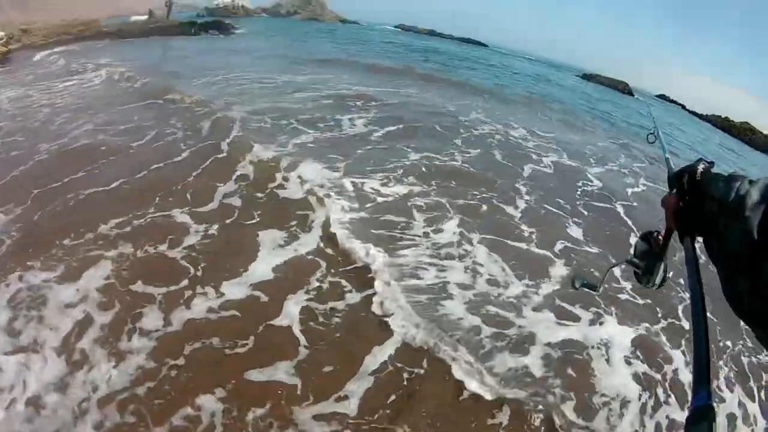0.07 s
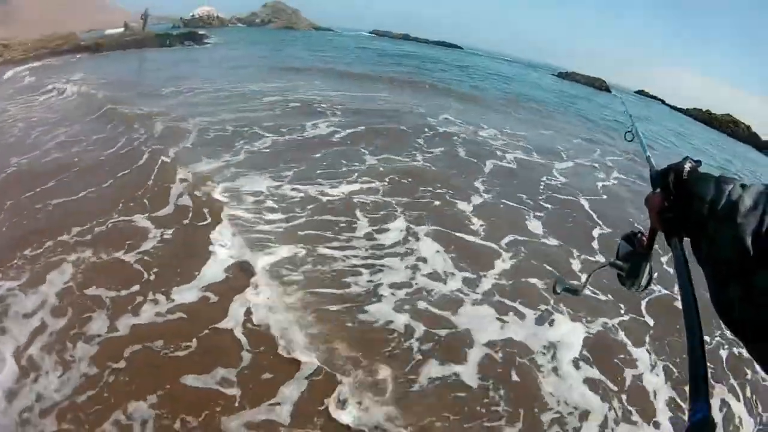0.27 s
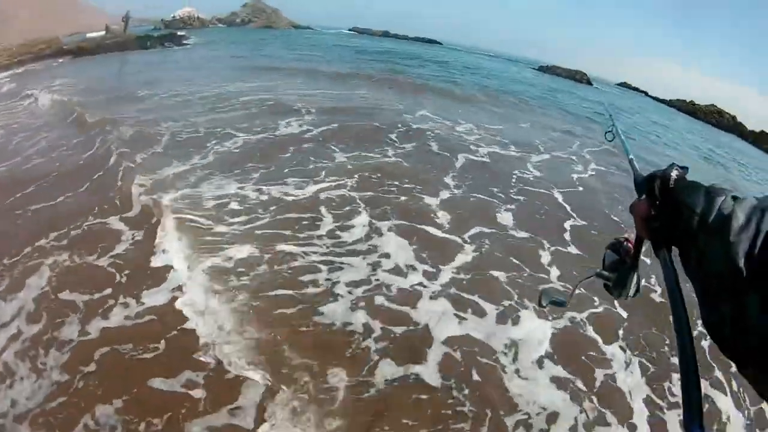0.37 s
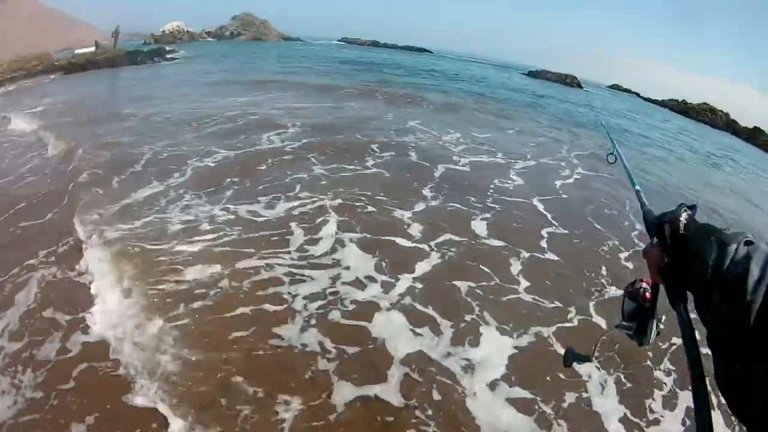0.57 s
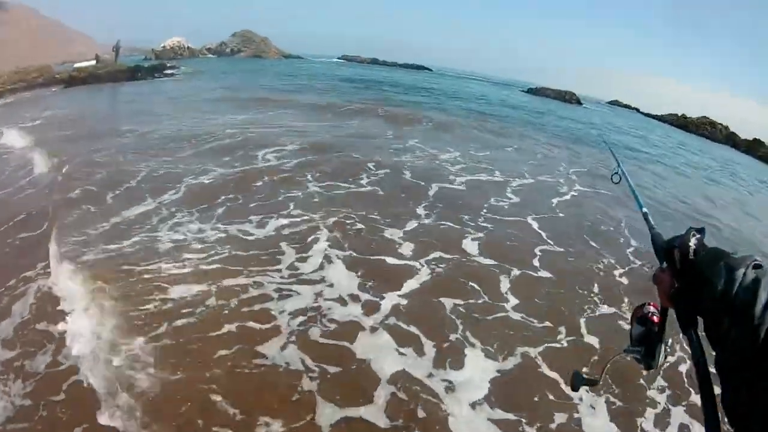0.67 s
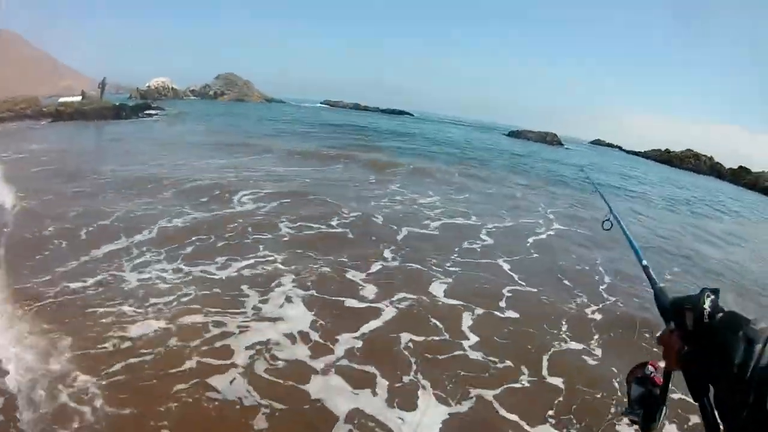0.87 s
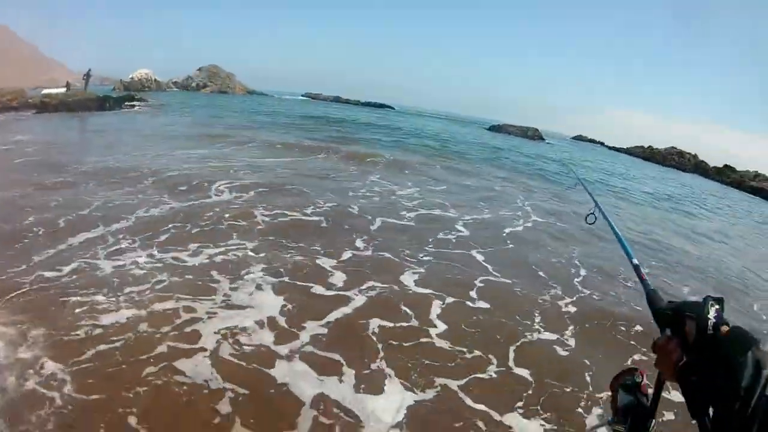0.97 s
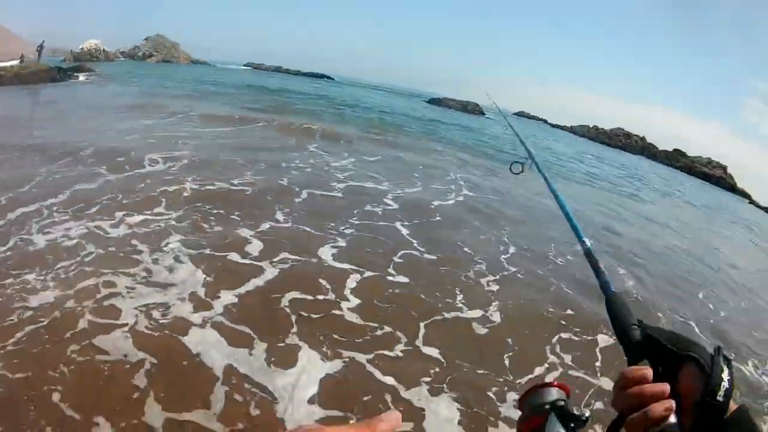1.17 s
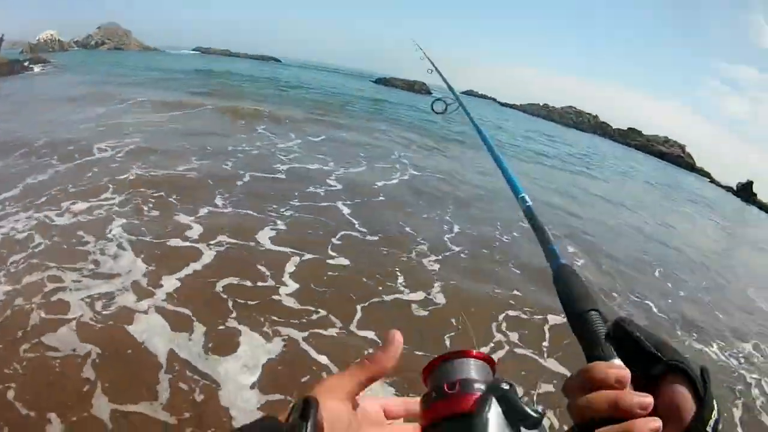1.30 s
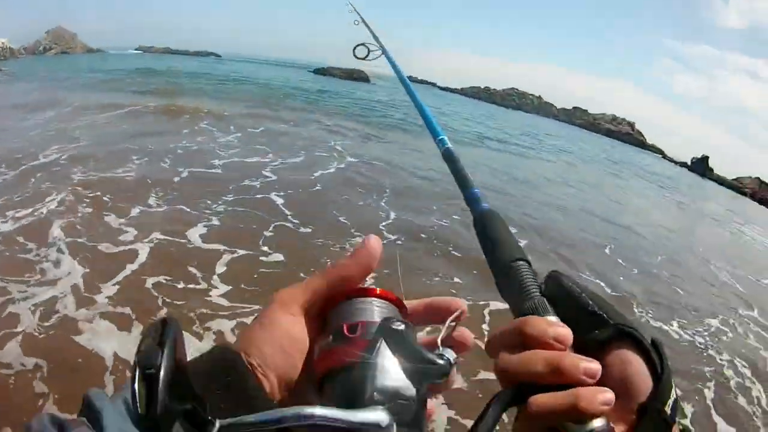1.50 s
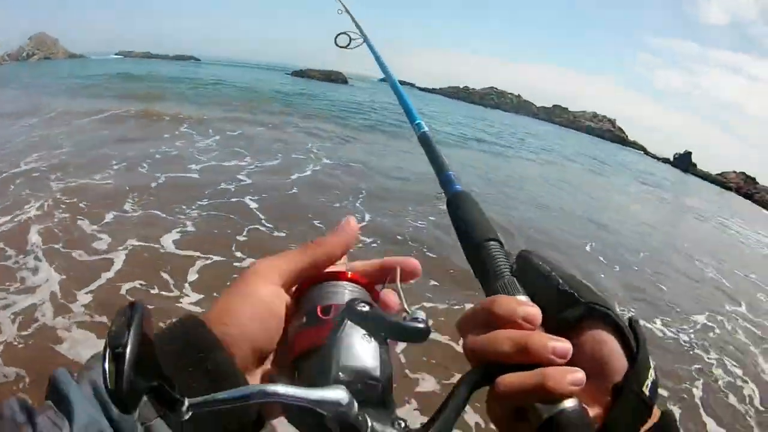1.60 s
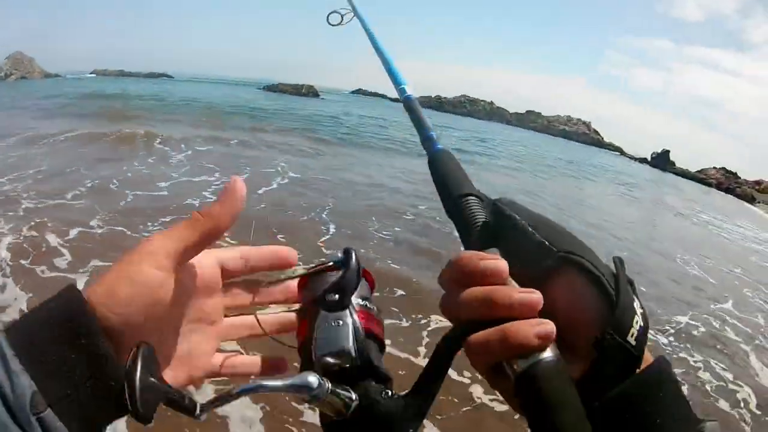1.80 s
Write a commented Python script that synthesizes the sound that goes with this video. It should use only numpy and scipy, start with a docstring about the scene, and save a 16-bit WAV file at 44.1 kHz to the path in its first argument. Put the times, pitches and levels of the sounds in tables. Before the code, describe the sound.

Shallow waves wash dully in the wind as fishing gear gives a single short knock.

```python
"""Angler on a windy shore

Shallow surf washes over rocks in steady wind, heard muffled through the waterproof case of a
body-worn camera. Both are shaped noise, and the air resonances of the case colour the surf.
The angler shifts the rod: one impact rings the gear, a sleeve brushes past, and handling adds
soft bumps, thin scratches and squeaks, a low stick-slip creak and faint ticks that ring the case."""
import sys
import numpy as np
from scipy import signal
from scipy.fft import rfft, irfft, next_fast_len
from scipy.io import wavfile
from scipy.ndimage import uniform_filter1d, map_coordinates

SR = 44100
rng = np.random.default_rng(int(sys.argv[2]) if len(sys.argv) > 2 else 0)


def transcribe(signal):
    """Save signal, clipped to [-1, 1], as a 16-bit WAV file at the path in sys.argv[1]."""
    frames = np.atleast_2d(signal).T
    limited = np.clip(frames, -1, 1)
    pcm = np.round(limited * 32767).astype(np.int16)
    wavfile.write(sys.argv[1], SR, pcm)


N = 81585
TIME_S = np.arange(N) / SR


def amp(db):
    """Decibels to amplitude ratio."""
    return 10 ** (np.asarray(db) / 20)

def unit_rms(x):
    """Normalisation to rms 1."""
    return x / np.sqrt(np.mean(x ** 2) + 1e-20)

def spectrum_db(points, hz):
    """Interpolation of a spectrum on a log frequency axis."""
    frequency_hz, gain_db = np.transpose(points)
    return np.interp(np.log(hz + 1), np.log(frequency_hz + 1), gain_db)

def contour_db(points):
    """Linear interpolation of a level over time."""
    return np.interp(TIME_S, *np.transpose(points))

def wobble(rate_hz):
    """Smooth random modulation: a spline through rate_hz knots a second."""
    return map_coordinates(rng.standard_normal(4096), [TIME_S * rate_hz], mode="wrap")

def filtered(x, response):
    """Linear filtering: the spectrum times a frequency response."""
    size = 2 * next_fast_len(N)
    return irfft(rfft(x, size) * response(np.fft.rfftfreq(size, 1 / SR)), size)[:N]

def minimum_phase(gain):
    """The causal response with this gain, by folding the cepstrum."""
    cepstrum = irfft(np.log(np.maximum(gain, 1e-6)))
    half = len(cepstrum) // 2
    cepstrum[1:half] *= 2
    cepstrum[half + 1:] = 0
    return np.exp(rfft(cepstrum))

def impulse(start_s):
    """A band-limited unit impulse."""
    offset = (TIME_S - start_s) * SR
    return np.sinc(offset) * (np.abs(offset) < 16)

def shaped_noise(shape_db, patchy_db):
    """Coloured noise of rms 1, its gain varying in random patches of time and frequency."""
    cells = signal.stft(rng.standard_normal(N), nperseg=512)[2]
    patches = uniform_filter1d(rng.standard_normal(cells.shape), size=4, axis=0)
    patches = uniform_filter1d(patches, size=8, axis=1)
    noise = signal.istft(cells * amp(patchy_db * unit_rms(patches)), nperseg=512)[1][:N]
    return unit_rms(filtered(noise, lambda hz: amp(shape_db(hz))))

def swell(start_s, length_s):
    """A half-sine envelope."""
    return np.sin(np.pi * np.clip((TIME_S - start_s) / length_s, 0, 1))

def phase(hz, jitter, rate_hz):
    """Phase as the integral of a frequency that wanders by the fraction jitter."""
    return 2 * np.pi * np.cumsum(hz * (1 + jitter * wobble(rate_hz))) / SR

def wavering_tones(rows, jitter, rate_hz):
    """Frequency-modulated sines, each under a half-sine envelope."""
    return sum(amp(db) * swell(start_s, length_s) * np.sin(phase(hz, jitter, rate_hz))
               for start_s, length_s, db, hz in rows)


# strength of the surf: time_s, level_db
SURF_LEVELS = [(0, -60.5), (.15, -57.5), (.35, -54.5), (.5, -55.5), (.57, -56), (.7, -54.5), (.8, -52),
               (1.0, -55), (1.15, -53), (1.27, -54.5), (1.38, -59), (1.48, -57.5), (1.53, -55),
               (1.6, -60.5), (1.85, -60.5)]
# surf through the case wall: frequency_hz, gain_db
SURF_SPECTRUM = [(100, -26), (300, -0.5), (500, -2.5), (750, -4), (1000, -2.5), (1350, -4), (1550, -10),
                 (1800, -14.5), (2200, -16.5), (2600, -25.5), (3800, -25.5), (5000, -36), (6200, -56.5),
                 (9000, -80)]
# air resonances of the case: centre_hz, width_hz, lift_db
CASE_RESONANCES = [(1267, 202, 8.5), (2110, 260, 6), (3260, 206, 8.5)]

def surf():
    """Cavity resonance: the air in the case lifts three bands of the broad noise of foam and wash."""
    def shape_db(hz):
        lift_db = sum(db / (1 + (2 * (hz - centre_hz) / width_hz) ** 2)
                      for centre_hz, width_hz, db in CASE_RESONANCES)
        return spectrum_db(SURF_SPECTRUM, hz) + lift_db
    envelope = amp(contour_db(SURF_LEVELS) + 0.58 * wobble(30.2))
    return envelope * shaped_noise(shape_db, patchy_db=1.5)

# strength of the wind: time_s, level_db
WIND_LEVELS = [(0, -60.5), (.1, -56.5), (.22, -57), (.3, -51.5), (.42, -50.5), (.53, -58), (.75, -54),
               (.9, -51.5), (1.1, -49), (1.25, -56), (1.42, -61), (1.6, -60.5), (1.85, -62.5)]
# gusting rumble: frequency_hz, gain_db
RUMBLE_SPECTRUM = [(15, -9.5), (35, 1.5), (60, -2), (130, -1.5), (190, -4), (280, -9), (450, -15.5),
                   (900, -49.5), (3000, -77.5)]

def wind_rumble():
    """Turbulence: gusts press unevenly on the case and make a lumpy rumble."""
    envelope = amp(contour_db(WIND_LEVELS) + 1.2 * wobble(22.17))
    return envelope * shaped_noise(lambda hz: spectrum_db(RUMBLE_SPECTRUM, hz), patchy_db=1.34)

# deep push of the wind: frequency_hz, gain_db
BUFFET_SPECTRUM = [(12, -8), (32, -3.5), (60, -5), (110, -7), (250, -30.5), (600, -51.5)]

def wind_buffet():
    """Stationary noise: the steady part of the wind lays a deep, even floor."""
    return amp(-61) * shaped_noise(lambda hz: spectrum_db(BUFFET_SPECTRUM, hz), patchy_db=0.8)

# soft handling contacts: start_s, peak_db, corner_hz
BUMPS = [(0.05, -44.5, 116), (.389, -36, 164), (0.4404, -30.5, 560), (0.4447, -31.5, 540), (.577, -43, 170),
         (0.6812, -35.5, 298), (0.6859, -38.5, 295), (1.1194, -39, 229), (1.59, -45.5, 150)]

def bumps(low_cut_hz=70, cloth_hz=1400):
    """Cushioned impact: cloth takes the treble from each contact, leaving a dull push with no ring."""
    def lowpass(hz, corner_hz):
        return 1 / (1 - (hz / corner_hz) ** 2 + 1.2j * hz / corner_hz)
    def cushion(hz):
        return 1j * hz / (low_cut_hz + 1j * hz) * lowpass(hz, cloth_hz)
    out = np.zeros(N)
    for start_s, peak_db, corner_hz in BUMPS:
        push = filtered(impulse(start_s), lambda hz: cushion(hz) * lowpass(hz, corner_hz))
        out += amp(peak_db) * push / np.abs(push).max()
    return out

# low tones in the wind: start_s, length_s, level_db, pitch_hz
HUMS = [(0.081, 0.097, -54, 199.1), (0.164, 0.19, -51.5, 181), (1.231, 0.12, -54.5, 191.7)]

def wind_hums():
    """Frequency modulation: faint hums waver in pitch as they come and go."""
    return wavering_tones(HUMS, jitter=0.024, rate_hz=60)

# colour of the blow: frequency_hz, gain_db
KNOCK_SPECTRUM = [(30, -31), (80, -15), (170, -10), (300, -11.5), (560, -12.5), (720, -1), (830, -4.5),
                  (980, 0), (1120, -0.5), (1220, -12), (1350, -7), (1520, -28), (2100, -38), (2650, -51),
                  (3250, -41), (4000, -37), (4900, -49.5), (5600, -63), (9000, -74.5)]
# modes of the gear: pitch_hz, level_db, t60_s
GEAR_MODES = [(278, -47, 0.017), (512, -40.5, 0.16), (690, -25, .04), (950, -31, .065), (1346, -40, .075),
              (1865, -42, 0.028), (2132, -29.5, 0.013), (2340, -33, 0.018), (2650, -45, 0.019),
              (3176, -31.5, .014), (3323, -29.5, 0.013), (3720, -41, .012), (4100, -33.5, 0.01),
              (4470, -36, 0.015), (4930, -41.5, .018)]

def gear_knock(start_s=0.2317, blow_gain_db=28, round_trip_s=0.00362, attack_s=0.00082):
    """Reflection and modal decay: a shock runs along the rod, returns inverted, and the gear rings."""
    def response(hz):
        returned = 0.44 / (1 + (hz / 3000) ** 2)  # each trip dulls the shock
        rod_echoes = 1 / (1 + returned * np.exp(-2j * np.pi * hz * round_trip_s))
        wall = 1340 ** 2 - hz ** 2 + 1j * hz * 750
        wall_delay = np.conj(wall) / wall  # all-pass: the case wall delays the band near 1340 Hz
        return minimum_phase(amp(spectrum_db(KNOCK_SPECTRUM, hz))) * rod_echoes * wall_delay
    blow = amp(blow_gain_db) * filtered(impulse(start_s), response)
    age_s = np.maximum(TIME_S - start_s, 0)
    ring = sum(amp(db - 60 * age_s / t60_s) * np.sin(2 * np.pi * hz * age_s)
               for hz, db, t60_s in GEAR_MODES)
    return ring * (1 - np.exp(-age_s / attack_s)) - blow

# strokes of the sleeve: peak_s, rise_s, fall_s, level_db
SLEEVE_STROKES = [(0.423, 0.036, 0.04, -43), (.492, 0.022, 0.026, -54.5), (0.673, .022, 0.011, -53),
                  (1.515, 0.022, 0.039, -60.5)]
# rubbing cloth: frequency_hz, gain_db
SLEEVE_SPECTRUM = [(60, 1.5), (200, 5), (350, -2.5), (500, -2.5), (720, -5.5), (950, -3.5), (1300, -6.5),
                   (1550, -10.5), (1950, -21), (2350, -12.5), (2900, -50), (3500, -20.5), (4300, -33),
                   (5500, -42), (9000, -69)]

def sleeve():
    """Sliding friction: jacket cloth brushes the case in fluttering swells of noise."""
    envelope = np.zeros(N)
    for peak_s, rise_s, fall_s, db in SLEEVE_STROKES:
        width_s = np.where(TIME_S < peak_s, rise_s, fall_s)
        envelope += amp(db) * np.exp(-((TIME_S - peak_s) / width_s) ** 2)
    flutter = amp(1.4 * wobble(270))
    return envelope * flutter * shaped_noise(lambda hz: spectrum_db(SLEEVE_SPECTRUM, hz), patchy_db=0)

# grazes on the reel: start_s, length_s, level_db
SCRATCHES = [(1.017, 0.01, -64), (1.498, 0.029, -70), (1.78, 0.033, -71)]
# colour of a graze: frequency_hz, gain_db
SCRATCH_SPECTRUM = [(1500, -28), (2600, -12), (3150, 6), (3700, -8), (4500, -11.5), (5500, -27),
                    (8000, -50)]

def reel_scratches():
    """Friction noise: fingers graze the reel in brief, thin bursts."""
    envelope = sum(amp(db) * swell(start_s, length_s) for start_s, length_s, db in SCRATCHES)
    return envelope * shaped_noise(lambda hz: spectrum_db(SCRATCH_SPECTRUM, hz), patchy_db=4.5)

def grip_creak(start_s=1.076, length_s=0.045, pitch_hz=203.3, level_db=-41, octave_db=-16):
    """Stick-slip oscillation: the grip catches and lets go for a few low cycles."""
    angle = phase(pitch_hz, jitter=0.06, rate_hz=150)
    envelope = amp(level_db) * np.abs(swell(start_s, length_s)) ** 0.5
    return envelope * (np.sin(angle) + amp(octave_db) * np.sin(2 * angle))

# light touches on the case: start_s, length_s, level_db, pitch_hz
TICKS = [(1.225, 0.017, -49, 1270), (1.537, .011, -49.5, 1248), (1.679, 0.0092, -50, 1356),
         (1.788, 0.036, -49.5, 1350)]

def case_ticks(upper_hz=3090, upper_db=-22):
    """Resonance: each light touch briefly excites two modes of the case."""
    def mode(hz):
        return np.sin(phase(hz, jitter=0.0343, rate_hz=400))
    return sum(amp(db) * swell(start_s, length_s) * (mode(hz) + amp(upper_db) * mode(upper_hz))
               for start_s, length_s, db, hz in TICKS)

# faint thin squeaks: start_s, length_s, level_db, pitch_hz
SQUEAKS = [(1.28, .035, -69.5, 3060), (1.396, .04, -74.5, 3040), (1.655, 0.027, -74, 3005)]

def squeaks():
    """Narrow-band vibration: very little pitch jitter leaves each squeak a nearly pure tone."""
    return wavering_tones(SQUEAKS, jitter=0.0074, rate_hz=150)

def through_case_wall(x, cutoff_hz=5140):
    """Transmission loss: the wall acts as a sixth-order low-pass filter."""
    return filtered(x, lambda hz: minimum_phase(1 / np.sqrt(1 + (hz / cutoff_hz) ** 12)))

def scene():
    """Superposition: handling, surf and wind add at one microphone."""
    handling = through_case_wall(bumps() + gear_knock() + sleeve())
    handling += grip_creak() + case_ticks() + squeaks() + reel_scratches()
    return (handling + surf() + wind_rumble() + wind_hums() + wind_buffet())[None]

# microphone hiss: frequency_hz, gain_db
HISS_SPECTRUM = [(100, 3.3), (6000, 2.5), (10500, -4.1), (15500, 2.5)]

def record(dry):
    """Self-noise and band limiting: the camera adds hiss and keeps nothing above its top frequency."""
    hiss_db, top_hz = -79, 15780
    hiss = filtered(rng.standard_normal(N), lambda hz: amp(spectrum_db(HISS_SPECTRUM, hz)) * (hz < top_hz))
    return filtered(dry[0] + amp(hiss_db) * unit_rms(hiss), lambda hz: hz < top_hz)[None]


dry = scene()
out = record(dry)
transcribe(out)
```